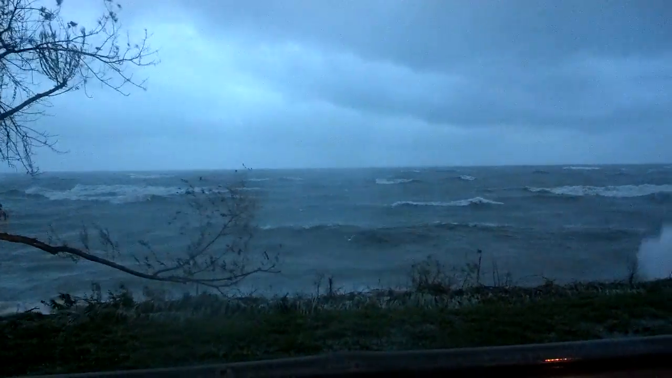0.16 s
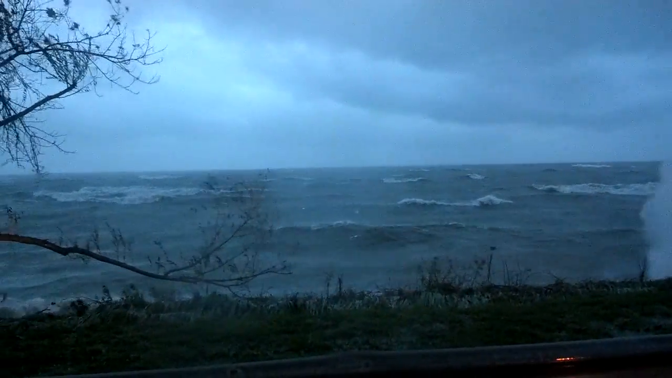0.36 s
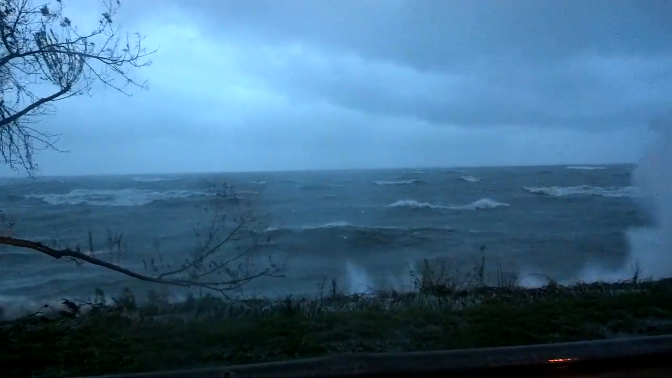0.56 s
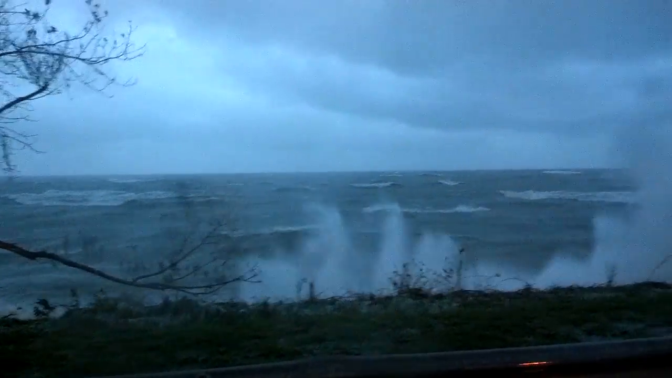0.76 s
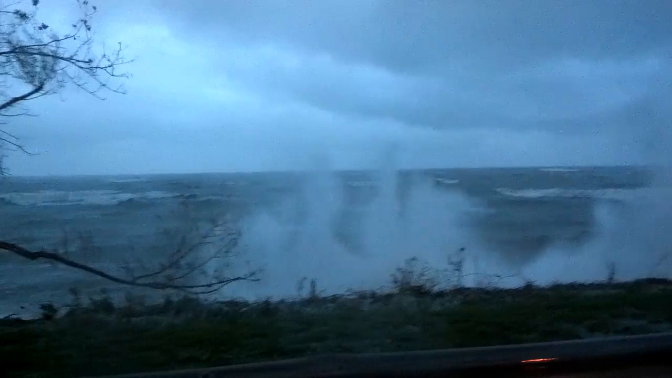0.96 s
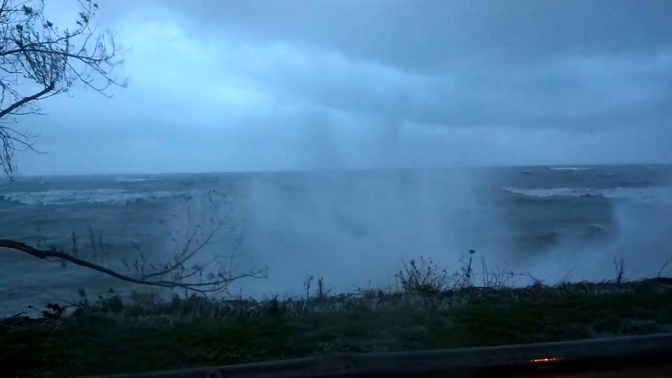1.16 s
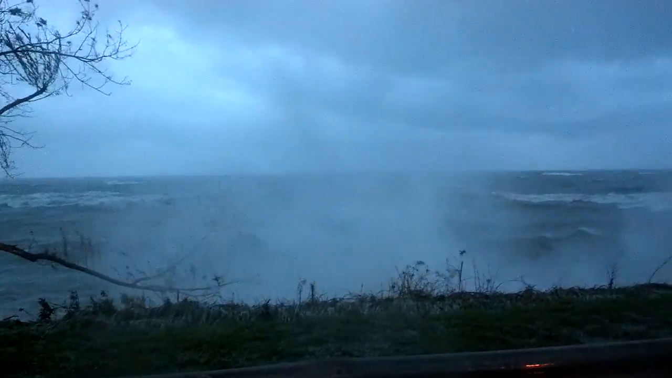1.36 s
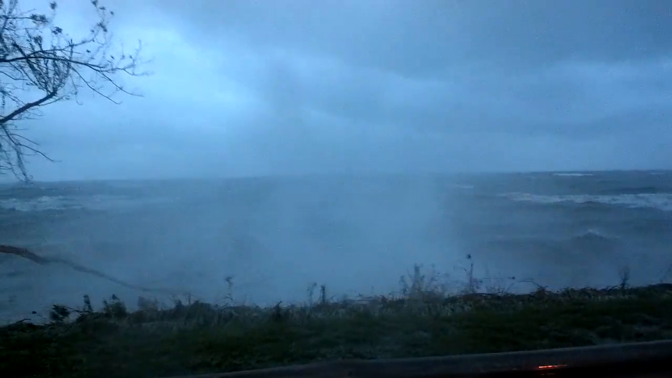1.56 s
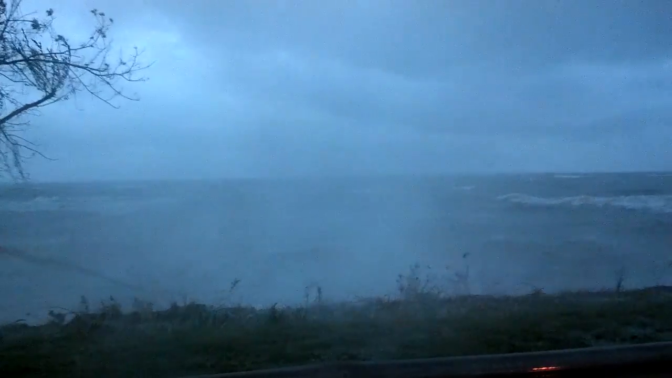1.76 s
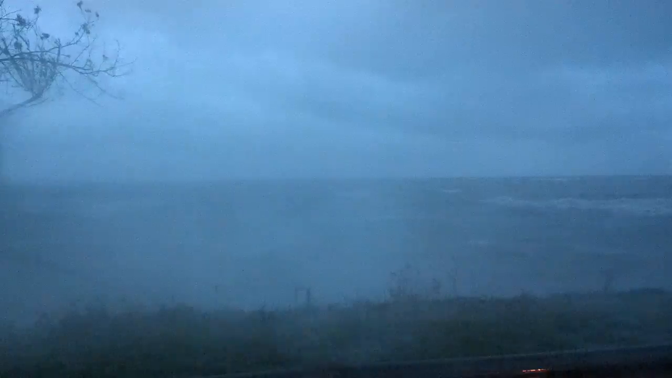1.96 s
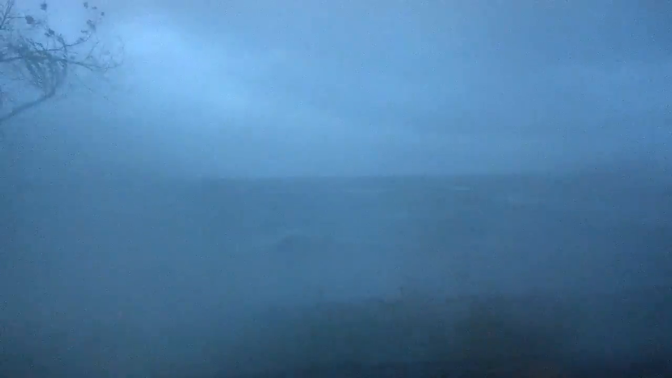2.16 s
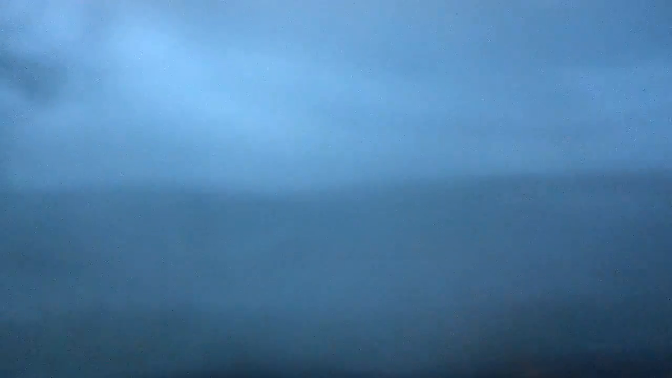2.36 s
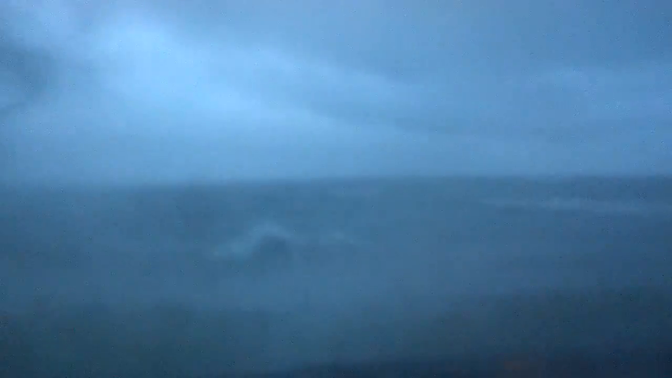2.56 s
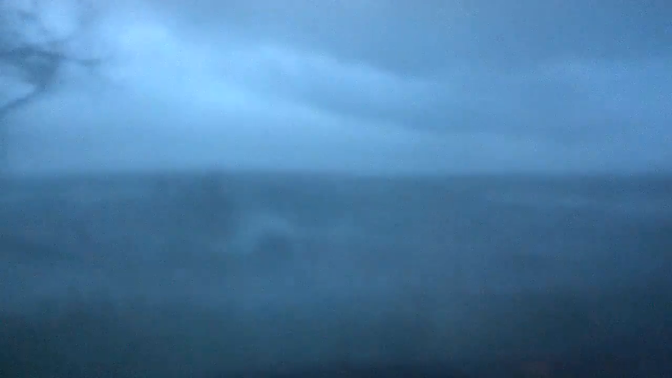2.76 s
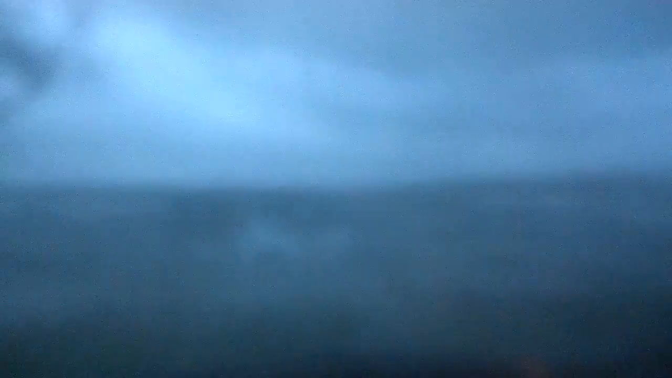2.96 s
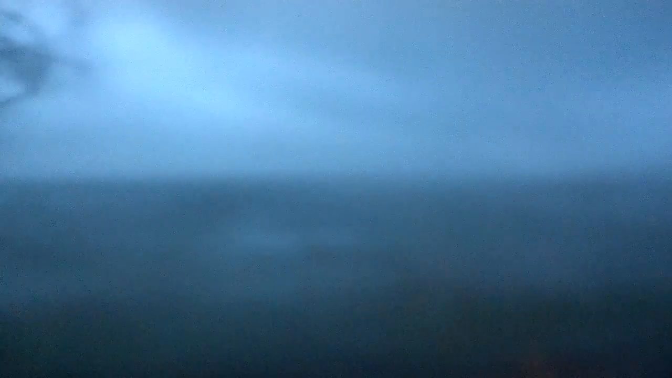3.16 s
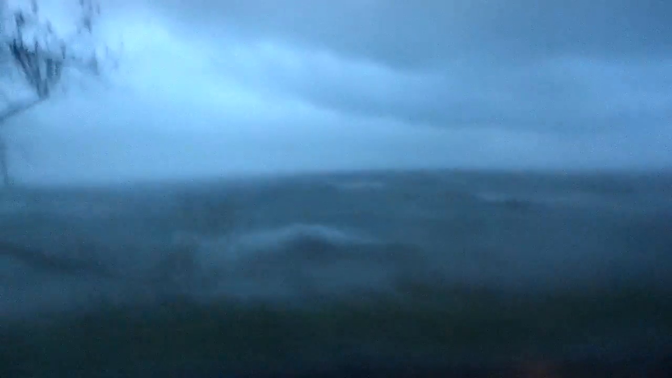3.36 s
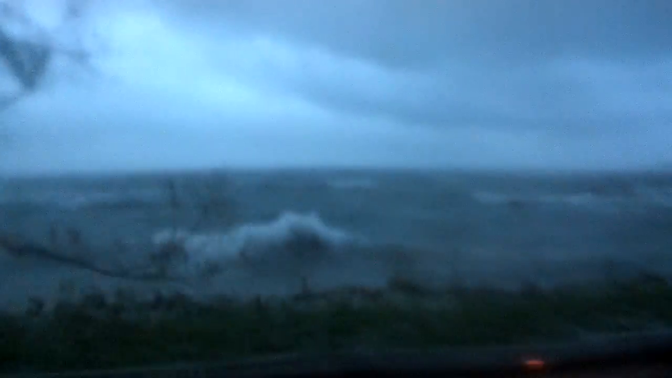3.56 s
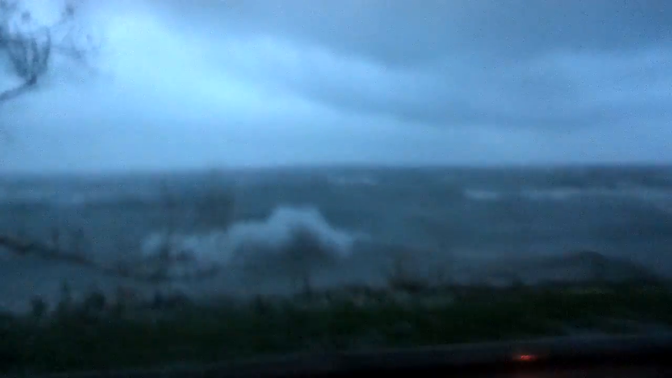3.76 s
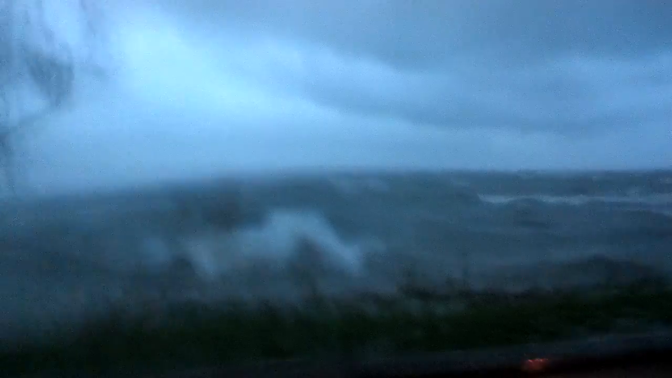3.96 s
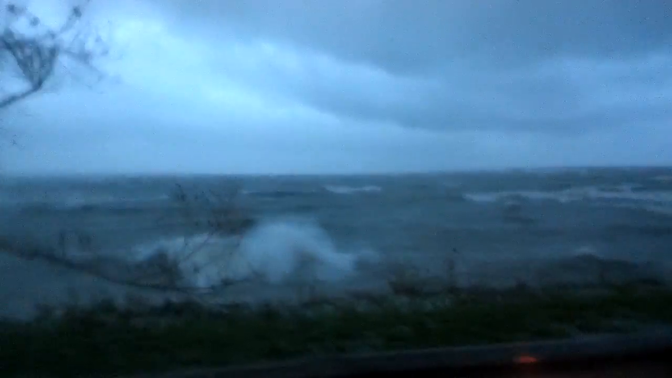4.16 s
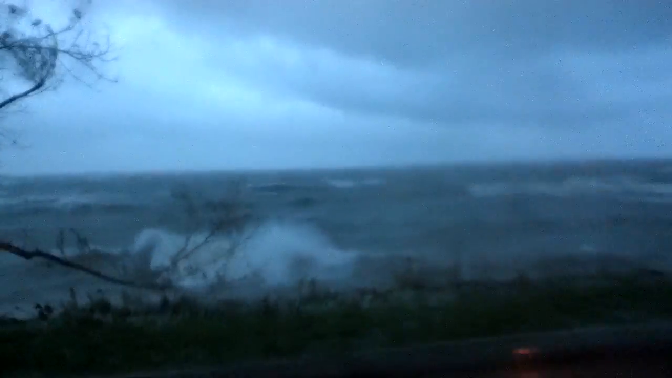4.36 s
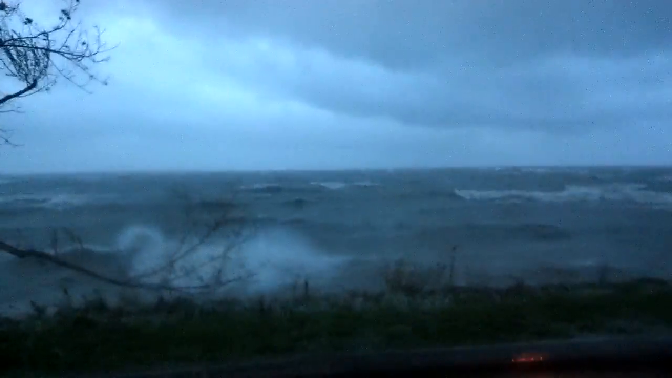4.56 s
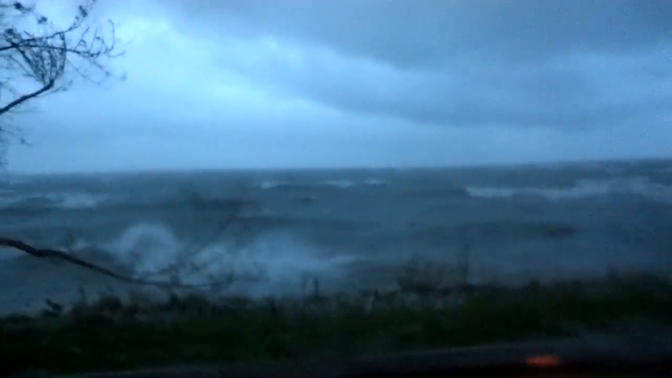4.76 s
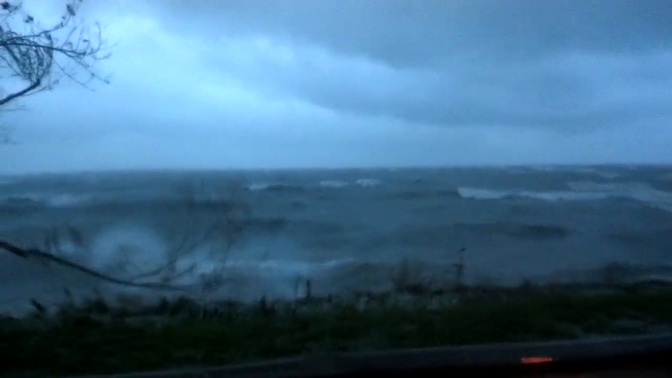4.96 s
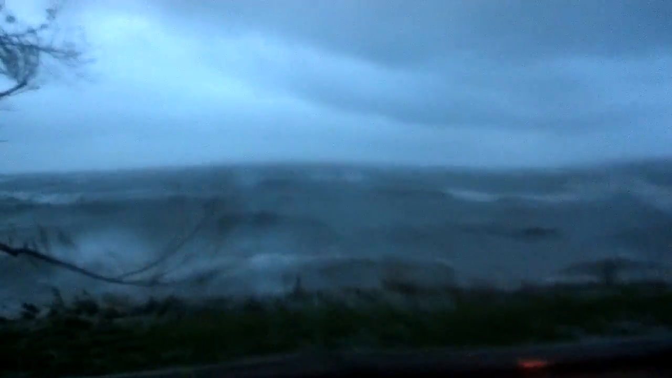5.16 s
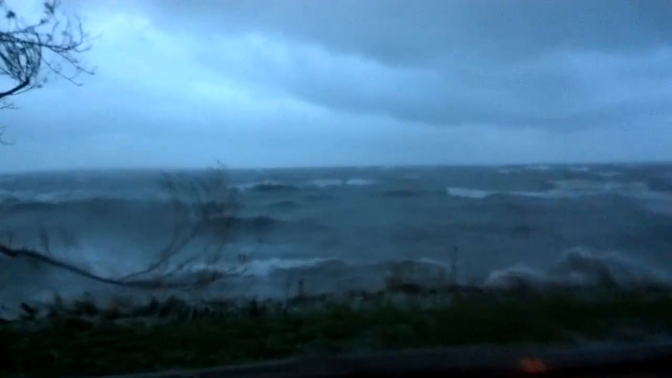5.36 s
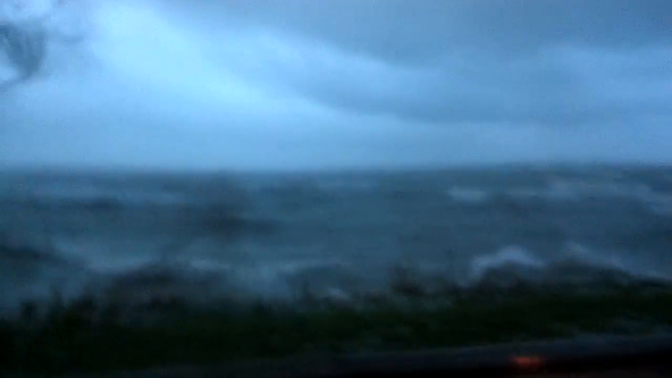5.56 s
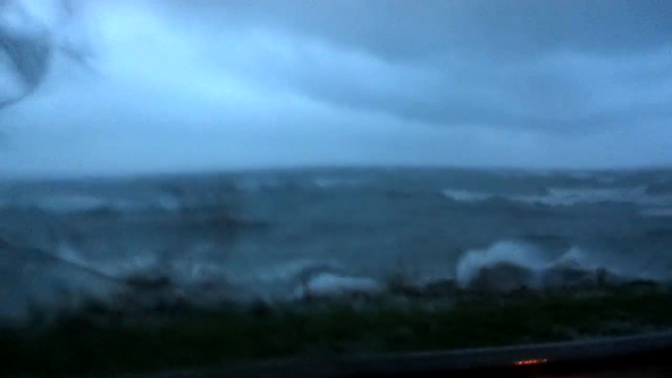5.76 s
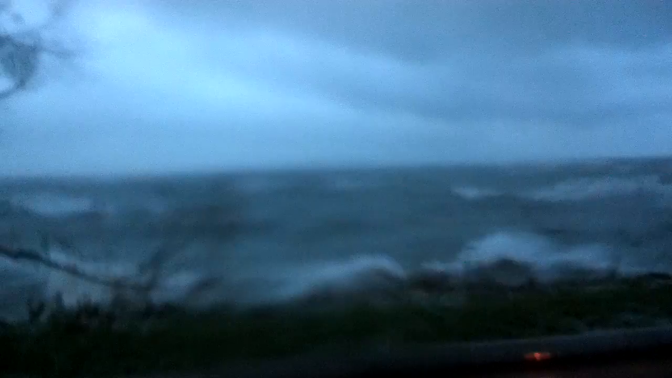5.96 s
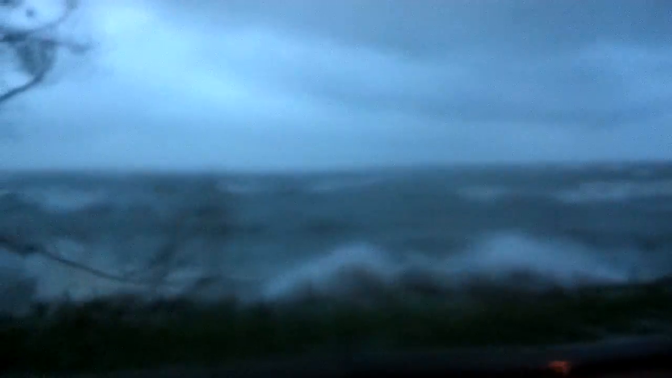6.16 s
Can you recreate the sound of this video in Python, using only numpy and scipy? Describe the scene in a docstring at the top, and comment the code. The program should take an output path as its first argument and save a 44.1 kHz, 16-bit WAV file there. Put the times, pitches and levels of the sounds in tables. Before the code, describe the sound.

Heard from inside a parked car facing a rough sea: gusty rain ticks sharply on the glass and drums dully on the roof over a low wind and surf roar. Around two seconds a wave's spray sweeps over in a dense, loud hiss with slaps and knocks, ending in a slosh. A quieter, thin patter follows, then a faint wind moan and heavier drumming gusts.

```python
"""Drops tick on the glass and drum on the roof of a parked car in a storm on a shore.
Each is a random train of short noise impacts filtered by the glass, roof modes or body it strikes.
Gusts drive the rain; the spray of a broken wave sweeps over the car and leaves a short lull.
Large drops, roof thumps, knocks and a slosh are placed singly; filtered noise gives wind and surf,
and a wavering sine moans."""
import sys
import numpy as np
from scipy import signal
from scipy.fft import rfft, irfft, next_fast_len
from scipy.io import wavfile
from scipy.ndimage import uniform_filter1d

SR = 44100
rng = np.random.default_rng(int(sys.argv[2]) if len(sys.argv) > 2 else 0)


def store_pcm(level_fs):
    """Save levels as 16-bit WAV."""
    pcm = np.round(np.clip(level_fs, -1, 1) * 32767).astype(np.int16)
    wavfile.write(sys.argv[1], SR, np.atleast_2d(pcm).T)


N = 273845
TIME = np.arange(N) / SR

# colour of water striking a pane: (frequency [Hz], relative spectral level [dB])
GLASS_COLOUR = [(200, -36), (600, -6), (1200, -2.5), (1700, -5), (2300, 3.5), (3100, 2.5), (5400, -7),
                (10000, -18), (13000, -17), (15500, -11.5)]


def gain_of(db):
    """Level law: decibels become an amplitude factor."""
    return 10 ** (np.asarray(db) / 20)


def evened(x):
    """Power normalization: scales a signal to rms 1."""
    return x / np.sqrt(np.mean(x ** 2) + 1e-20)


def steadied(x, size=3500):
    """Envelope normalization: holds the slow level near rms 1 and leaves single impacts standing out."""
    power = uniform_filter1d(uniform_filter1d((x ** 2).mean(0), size), size)
    return x / np.sqrt(abs(power) + 1e-9)


def wobble(size):
    """Low-pass random process: twice-averaged noise drifts slowly, at rms 1."""
    return evened(uniform_filter1d(uniform_filter1d(rng.standard_normal(N), size), size))


def read(points, hz):
    """Spectral interpolation: a table's value on a log-frequency axis."""
    f, value = np.transpose(points)
    return np.interp(np.log(hz + 1), np.log(f + 1), value)


def follow(rows):
    """Linear interpolation in time: a curve's value at every sample."""
    return np.interp(TIME, *np.transpose(rows))


def add(mix, s, sound):
    """Superposition: mixes a sound in at time s [s]."""
    part = mix[:, max(round(s * SR), 0):][:, :sound.shape[1]]
    part += sound[:, :part.shape[1]]


def response(spectrum, size=4096):
    """Minimum phase: a causal impulse response of this colour, with energy 1."""
    log_gain = np.log(gain_of(read(spectrum, abs(np.fft.fftfreq(size, 1 / SR)))))
    # the Hilbert transform of the log gain supplies the phase
    transfer = np.exp(np.conj(signal.hilbert(log_gain)))
    taps = np.fft.ifft(transfer).real[:size // 2]
    return taps / np.linalg.norm(taps)


def through(x, taps):
    """Linear filtering: convolves both channels with an impulse response."""
    return signal.oaconvolve(x, taps[None], axes=1)[:, :x.shape[1]]


def brightened(spectrum, treble_db):
    """Spectral tilt: the treble changes over the octave above 3500 Hz, then by a constant amount."""
    return [(hz, level + treble_db * np.clip(np.log2(hz / 3500), 0, 1)) for hz, level in spectrum]


def rippled(spectrum, ripple_db, count=70):
    """Modal excitation: each spot on a pane favours other modes, here as random spectral ripple."""
    hz = np.geomspace(200, 16000, count)
    return np.transpose([hz, read(spectrum, hz) + ripple_db * rng.standard_normal(count)])


def cabin(taps, wet_db, absorb_hz=5000):
    """Early reverberation: a small cabin's decaying reflections, whose treble the seats soak up."""
    t = TIME[:len(taps)]
    echoes = rng.standard_normal(len(t)) * np.exp(-t / .005)
    echoes = echoes / np.linalg.norm(echoes)
    echoes = signal.sosfilt(signal.butter(1, absorb_hz, fs=SR, output="sos"), echoes)
    return taps + gain_of(wet_db) * signal.fftconvolve(taps, echoes)[:len(taps)]


def splash(t, decay, tail_db, tail_decay, hold=0):
    """Two-stage decay of impact power: the drop flattens in a quick burst, then its droplets scatter."""
    burst = np.exp(-2 * np.maximum(t - hold, 0) / decay)
    scatter = gain_of(tail_db) ** 2 * np.exp(-2 * t / tail_decay)
    return burst + scatter


def shower(per_s, spread_db, shape, largest=3.8):
    """Shot noise: impacts at random times and of random size, each a burst of the given power shape."""
    hits = np.flatnonzero(rng.random(N) < per_s / SR)
    power = np.zeros(N)
    size = np.minimum(rng.exponential(1, N)[hits], largest)
    power[hits] = gain_of(spread_db * size) ** 2
    envelope = np.sqrt(abs(signal.oaconvolve(power, shape)[:N]))
    return envelope * rng.standard_normal((2, N))


def gust(start, length):
    """Attack, build and exponential release: a gust's drive on glass, roof and body, 0 dB midway."""
    # one row each for glass, roof, body: (rise time [s], build over the gust [dB], fall constant [s])
    gust_shape = [(0.039, 4.5, 0.059), (0.03, 5, 0.14), (0.035, 1.5, 0.12)]
    rise, build_db, fall = np.transpose(gust_shape)[:, :, None]
    age = TIME - start
    attack = np.clip(age / rise, 0, 1)
    build = gain_of(build_db * (np.clip(age / length, 0, 1) - 0.5))
    release = np.exp(-np.maximum(age - length, 0) / fall)
    return attack * build * release


def rainfall():
    """Power addition: steady rain, gusts and the wave sum to drive levels in dB on glass, roof and body."""
    # rain between the gusts: (drive on glass [dB], on roof [dB], on body [dB])
    steady_rain = (-47.5, -45.5, -46.5)
    # gusts that fling rain at the car:
    # (start [s], length [s], mid-gust drive on glass [dB], on roof [dB], on body [dB])
    gusts = [(-0.05, .19, -40, -43, -41), (0.138, 0.26, -33.5, -41, -44), (0.473, 0.17, -45.5, -36, -38),
             (0.753, 0.31, -39, -37, -40), (1.115, 0.26, -39.5, -38.5, -40.5),
             (1.445, 0.095, -36.5, -33, -43.5), (1.623, 0.13, -44.5, -32.5, -41.5),
             (2.784, 0.34, -38, -61, -41), (3.178, 0.22, -39, -61, -45.5),
             (3.431, 0.28, -35.5, -41.5, -40.5), (3.72, 0.29, -32.5, -33, -36.5),
             (4.075, 0.31, -29.5, -33, -32.5), (4.455, 0.28, -37, -38, -41),
             (4.749, 0.12, -35, -32.5, -37.5), (4.92, 0.088, -38, -36, -41), (5.057, 0.12, -33, -27.5, -33),
             (5.234, 0.23, -31.5, -28.5, -36), (5.542, 0.14, -36.5, -33.5, -41),
             (5.716, 0.15, -35.5, -34.5, -34), (5.897, 0.24, -37, -32.5, -33.5)]
    # spray of a broken wave: (time [s], drive on glass [dB], on roof [dB], on body [dB])
    wave = [(1.817, -37.5, -75, -49), (1.88, -32, -36, -41), (1.91, -26, -27, -39),
            (1.973, -19, -30.5, -31), (2.04, -22, -33.5, -28.5), (2.38, -21, -33, -21),
            (2.45, -26.5, -33, -23.5), (2.59, -30.5, -34, -25), (2.636, -22, -32, -20.5),
            (2.71, -34, -23.5, -29), (2.825, -42, -39, -37)]
    power = np.outer(gain_of(steady_rain) ** 2, np.ones(N))
    for start, length, *levels_db in gusts:
        power += (gain_of(levels_db)[:, None] * gust(start, length)) ** 2
    times, *wave_db = np.transpose(wave)
    # the wave is silent outside its table
    wave_curves = [np.interp(TIME, times, db, left=-np.inf, right=-np.inf) for db in wave_db]
    power += gain_of(wave_curves) ** 2
    return 10 * np.log10(power)


def glass(patter_db, level_db=-3, thickening_db=1.0, edge_hz=6000, count=6):
    """Shot noise on panes: drops tick on dull and bright spots, denser in strong gusts, over a fine mist."""
    # evenly hissing mist: (time [s], share of the water's power on the glass [0-1])
    mist_share = [(1.8, .28), (1.9, .7), (3.1, .8), (3.2, .3), (5.0, .45)]
    # drops sound sharper on bare glass than on a film of water: (time [s], gain above edge_hz [dB])
    sharpness = [(0, 4.5), (1.5, 8), (2.2, -0.5), (2.75, -1.5), (3.4, 4.5)]
    shape = splash(TIME[:SR // 20], decay=.0008, tail_db=-16, tail_decay=.004, hold=.0012)
    # rate on each spot [1/s]
    per_s = 30 * gain_of(thickening_db * (patter_db - np.median(patter_db)))
    drops = np.zeros((2, N))
    for treble_db in np.linspace(-10, 4, count):
        colour = rippled(brightened(GLASS_COLOUR, treble_db), ripple_db=.8)
        spot = cabin(response(colour), wet_db=-4)
        drops += through(shower(per_s, spread_db=3.6, shape=shape, largest=2.2), spot)
    drops = steadied(drops, size=2200) * gain_of(1.2 * wobble(size=800))
    mist = through(rng.standard_normal((2, N)), response(GLASS_COLOUR))
    share = np.clip(follow(mist_share), 0, 1)
    patter = np.sqrt(1 - share) * drops + np.sqrt(share) * mist
    high_pass = signal.butter(2, edge_hz, "highpass", fs=SR, output="sos")
    edge = signal.sosfiltfilt(high_pass, patter)
    return gain_of(patter_db + level_db) * (patter + (gain_of(follow(sharpness)) - 1) * edge)


def roof_ring(flipped=.5, lowest_hz=115):
    """Modal superposition: damped panel modes struck at a random spot, a share of them flipped in sign."""
    # modes of the roof panel: (frequency [Hz], bandwidth [Hz], level before tilt and bandwidth [dB])
    modes = [(158.4, 8.2, -13.5), (273.4, 27, -2), (298.3, 25.6, -1.5), (355.7, 37.5, 2.5), (393, 43, -3),
             (503, 23.4, -9.5), (634, 38, -11), (1050, 99, -12.5)]
    t = TIME[:SR // 6]
    tilt_db = rng.uniform(-2, 3.5)  # per octave: a dull or bright spot
    ring = np.zeros(len(t))
    for hz, width, db in modes:
        strength = gain_of(db + tilt_db * np.log2(hz / lowest_hz)) * np.sqrt(width)
        strength *= np.sign(rng.random() - flipped) * rng.uniform(0.25, 1)
        ring += strength * np.exp(-np.pi * width * t) * np.sin(2 * np.pi * hz * t)
    # below its modes the panel hardly radiates
    ring = signal.sosfilt(signal.butter(2, lowest_hz, "highpass", fs=SR, output="sos"), ring)
    return ring / np.linalg.norm(ring)


def roof(drum_db, level_db=-2.0, drops_per_s=38, count=7):
    """Modes driven by shot noise: drops drum on several spots of sheet metal, dulled by the lining."""
    shape = splash(TIME[:SR // 20], decay=0.0017, tail_db=-15.0, tail_decay=0.02)
    drum = np.zeros((2, N))
    for _ in range(count):
        drum += through(shower(drops_per_s, spread_db=2.0, shape=shape), roof_ring())
    return gain_of(drum_db + level_db) * steadied(drum, size=2000)


def spray(spray_db, level_db=0, swell=1.19, drops_per_s=1500):
    """Dense shot noise: sheets of water slap the body and swell when the wave's spray arrives."""
    # colour of water on the body: (frequency [Hz], relative spectral level [dB])
    body_colour = [(30, -62), (150, -4), (300, -1), (500, 4.5), (1050, 0.5), (1500, -5), (2200, -4.5),
                   (3500, -8.5), (6000, -29), (15000, -24.5)]
    shape = splash(TIME[:SR // 20], decay=0.00038, tail_db=-11.0, tail_decay=0.0093)
    # swell stretches the level range below its maximum
    level = spray_db.max() + swell * (spray_db - spray_db.max()) + level_db
    slaps = through(shower(drops_per_s, spread_db=0, shape=shape), response(body_colour))
    return gain_of(level) * steadied(slaps, size=2200)


def wind(drum_db, level_db=2, gust_share=0.77):
    """Filtered broadband noise: the low roar of wind and surf through the closed car rises with gusts."""
    # colour of the roar: (frequency [Hz], relative spectral level [dB])
    rumble = [(55, -23), (90, -6), (150, 3.5), (400, -3), (1000, -25.5), (4000, -71)]
    # wind and surf outside: (time [s], level before gusts and level_db [dB])
    wind_level = [(0.25, -42), (1.6, -48), (3.2, -50.5), (4.25, -38.5), (4.55, -45.5), (5.4, -43)]
    gust_db = drum_db - uniform_filter1d(drum_db, size=30000)
    roar = evened(through(rng.standard_normal((2, N)), response(rumble)))
    return gain_of(follow(wind_level) + gust_share * gust_db + level_db) * roar


def big_drops(level_db=3.0, usual_treble_db=-12.5):
    """Impulsive excitation: large drops hit glass with a snap and fizz, each with its own reflections."""
    # biggest drops: (time [s], crack rms before level_db [dB],
    # treble relative to crack, against usual_treble_db [dB])
    ticks = [(0.1014, -31, 4), (0.185, -30.5, 4), (0.2235, -29.5, -6), (0.245, -34, -10), (0.293, -28, -18),
             (0.33, -34, -9), (0.378, -27, -11), (0.407, -28.5, -5), (0.5015, -36, -9), (0.548, -33, -8),
             (0.629, -31.5, -16), (0.672, -27.5, -13), (0.7023, -26, -4), (0.9207, -34, 10),
             (0.9445, -30, -6), (1.02, -27, -2), (1.184, -29.5, -13), (1.3498, -31, -8), (1.5278, -37, -3),
             (1.539, -38, -6), (1.7712, -25, -4), (3.21, -42, -19), (3.228, -43, -26), (3.491, -35, -2),
             (3.5204, -36, -7), (3.6237, -46, -19), (3.804, -25, -12), (3.973, -26.5, -10),
             (4.1213, -26.5, -16), (4.4261, -28, -2), (4.7292, -35.5, -5), (4.802, -32, -7),
             (4.8477, -29, -5), (5.03, -26, -15), (5.3186, -34.5, 2), (5.469, -30, -13), (5.5116, -30, -9),
             (5.6235, -28, -5), (5.7585, -26, -13.5), (5.7813, -25.5, -12), (5.851, -34, -17),
             (6.003, -29.5, -14)]
    t, out = TIME[:SR // 16], np.zeros((2, N))
    shape = np.sqrt(splash(t, decay=.001, tail_db=-17, tail_decay=.005, hold=.001))
    snap = .7 * np.linalg.norm(shape) * (t == 0)
    for s, db, treble_db in ticks:
        colour = brightened(GLASS_COLOUR, treble_db - usual_treble_db)
        spot = cabin(response(rippled(colour, ripple_db=1.5)), wet_db=-6)
        crack = through(snap + shape * rng.standard_normal((2, len(t))), spot)
        # the first 3 ms set the level
        crack_rms = crack[:, :3 * SR // 1000].std(axis=1, keepdims=True)
        add(out, s, gain_of(db + level_db) * crack / crack_rms)
    return out


def heavy_drops(level_db=-1, far_port=0.54, push=0.0072):
    """In-phase modal excitation: water blobs thump the roof, pushing its near-channel modes one way."""
    # blobs of water on the roof: (time [s], peak before level_db [dB])
    thuds = [(0.229, -19.5), (0.521, -22), (0.785, -27), (0.923, -24), (1.463, -21.5), (1.547, -17),
             (1.598, -19.5), (1.673, -19), (1.721, -24.5), (3.713, -21.5), (3.852, -18), (4.253, -18.5),
             (4.659, -19), (4.836, -21), (5.065, -21.5), (5.181, -21.5), (5.358, -16.5), (5.411, -17),
             (5.706, -18), (5.961, -14.5), (6.004, -16.5), (6.139, -20.5)]
    out = np.zeros((2, N))
    for s, db in thuds:
        ring = np.array([roof_ring(flipped=0), far_port * roof_ring()])
        # a soft or hard push: its onset lasts half to twice the usual time [s]
        onset = push * 2 ** rng.uniform(-1, 1)
        ring = ring * (1 - np.exp(-(TIME[:ring.shape[1]] / onset) ** 2))
        add(out, s, gain_of(db + level_db) * ring / abs(ring).max())
    return out


def knocks(low_hz=600, high_hz=1400, ring_s=0.0043):
    """Modal overlap: a fat drop bends the windscreen, whose crowded middle modes ring very briefly."""
    # fat drops on the windscreen: (time [s], peak [dB])
    knock_peaks = [(0.378, -25), (0.629, -27), (0.884, -23), (2.306, -15), (2.376, -12), (3.5202, -23.5),
                   (5.361, -22)]
    t, out = TIME[:SR // 20], np.zeros((2, N))
    pane = signal.butter(2, [low_hz, high_hz], "bandpass", fs=SR, output="sos")
    for s, db in knock_peaks:
        ring = signal.sosfilt(pane, np.exp(-t / ring_s) * rng.standard_normal((2, len(t))))
        add(out, s, gain_of(db) * ring / abs(ring).max())
    return out


def slab():
    """Band-limited noise under a Gaussian envelope: a slab of water lands as the spray ends, sloshing."""
    # the landing: (time [s], level [dB], spread in time [s])
    landing = (2.685, -22.5, 0.057)
    # colour of the slosh: (frequency [Hz], relative spectral level [dB])
    slosh_colour = [(40, -70), (280, -7), (420, 7), (650, 7.5), (1600, -11.5), (5000, -75)]
    s, db, spread = landing
    envelope = np.exp(-((TIME - s) / spread) ** 2 / 2)
    slosh = through(rng.standard_normal((2, N)), response(slosh_colour))
    return gain_of(db) * envelope * slosh


def moan(waver_hz=4, flutter_db=2):
    """Frequency modulation: wind at a gap in the body gives a sliding sine that wavers in pitch and level."""
    # course of the moan: (time [s], pitch before waver [Hz], rms level before flutter [dB])
    moan_course = [(3.15, 250, -85), (3.25, 256.2, -44.5), (3.75, 279, -60), (4.02, 296, -36.5),
                   (4.2, 263.3, -31), (4.4, 259.5, -34), (4.48, 252.4, -47)]
    times, pitch_hz, db = np.transpose(moan_course)
    pitch = np.interp(TIME, times, pitch_hz) + waver_hz * wobble(size=1500)
    turns = np.cumsum(pitch) / SR
    course_db = np.interp(TIME, times, db, left=-np.inf, right=-np.inf)
    level = gain_of(course_db + flutter_db * wobble(size=1500))
    return np.array([level * evened(np.sin(2 * np.pi * turns)), np.zeros(N)])


def scene():
    """Superposition: water on glass, roof and body, over the wind; returns a near and a diffuse channel."""
    patter_db, drum_db, spray_db = rainfall()
    water = glass(patter_db) + roof(drum_db) + spray(spray_db)
    impacts = big_drops() + heavy_drops() + knocks() + slab()
    return water + impacts + wind(drum_db) + moan()


def record(dry, depth=1.008, left_lead=0.79, low_cut_hz=66):
    """Interchannel coherence: two ports little related in the deep bass, more alike above it, then
    in and out of phase by turns up the treble."""
    # likeness of the ports up to the low middle: (frequency [Hz], real part of the coherence [0-1])
    bass_likeness = [(60, .1), (120, .3), (300, .72), (650, .62), (1400, .96)]
    # balance of the ports: (frequency [Hz], left over right, applied after the coherence mix [dB])
    port_balance = [(150, 0), (350, 1), (600, 3), (1100, 0)]
    port_lag, edge_hz = 16 / SR, 15950  # lag [s], upper band limit [Hz]
    size = next_fast_len(N + SR // 10)
    dry = signal.sosfilt(signal.butter(2, low_cut_hz, "highpass", fs=SR, output="sos"), dry)
    hz = np.fft.rfftfreq(size, 1 / SR)
    near, diffuse = rfft(dry, size)
    turn = 2 * np.pi * hz * port_lag
    alike = np.where(turn < np.pi, read(bass_likeness, hz), -depth * np.cos(turn))
    alike = np.clip(alike, -.9997, .9997)
    # the imaginary part shifts the phase between the ports
    lead = np.clip(left_lead, 0, 1) * np.sin(turn) * np.sqrt(1 - alike ** 2)
    likeness = alike + 1j * lead
    pair = np.array([near, likeness * near + np.sqrt(1 - abs(likeness) ** 2) * diffuse])
    lean = gain_of(read(port_balance, hz) / 2)
    wide = irfft(pair * np.array([lean, 1 / lean]), size)[:, :N]
    low_pass = signal.firwin(401, edge_hz, window=("kaiser", 9), fs=SR)
    return signal.oaconvolve(wide, low_pass[None], "same")


dry = scene()
out = record(dry)
store_pcm(out)
```